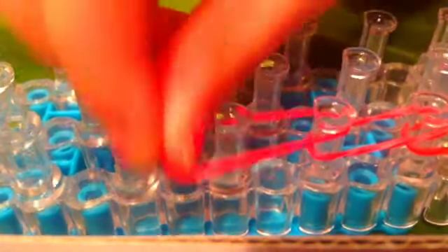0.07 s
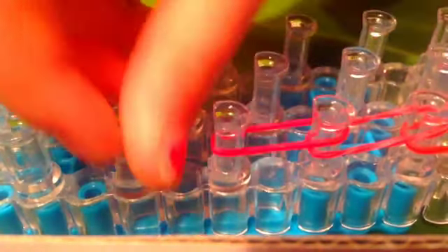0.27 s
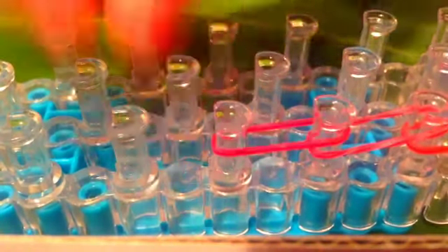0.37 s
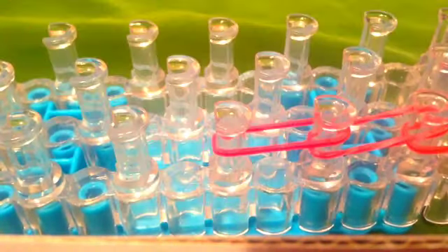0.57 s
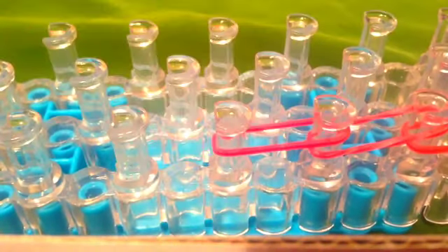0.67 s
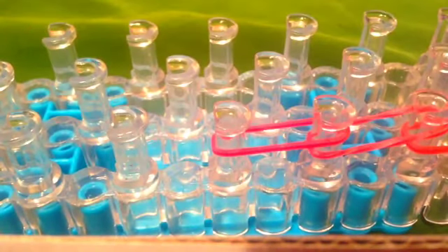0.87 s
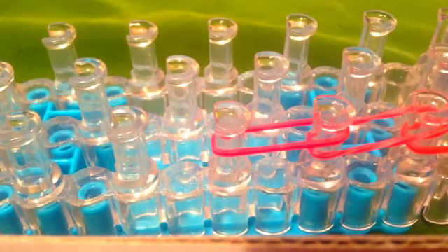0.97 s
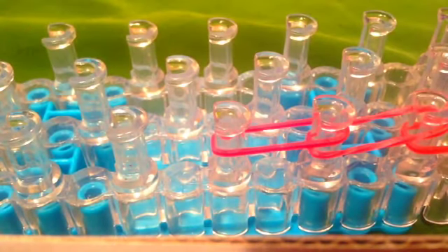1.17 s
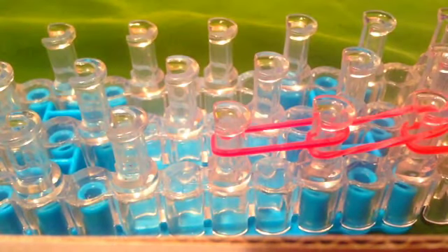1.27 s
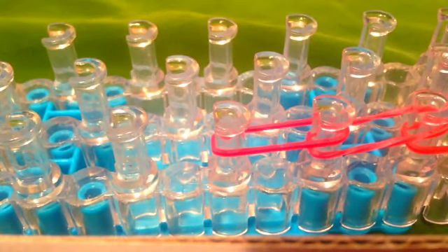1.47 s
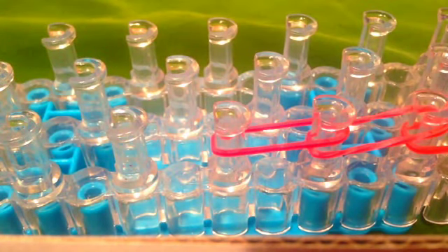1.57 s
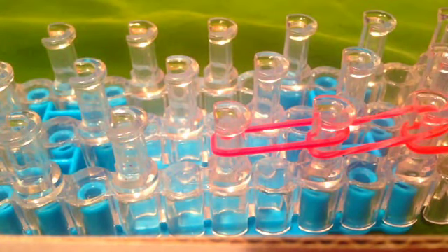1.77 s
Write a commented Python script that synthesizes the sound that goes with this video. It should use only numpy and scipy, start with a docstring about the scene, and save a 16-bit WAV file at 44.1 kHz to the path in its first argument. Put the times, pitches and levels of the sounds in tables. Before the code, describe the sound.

A rubber band slips off a fingertip and snaps onto a plastic peg with one bright click and a slight hollow knock. Soft finger rubbing surrounds it, then faint ticks follow, close to the microphone in a quiet room.

```python
"""Fingers rub and bump a plastic loom, close up, easing a rubber band over a peg.
At 0.21 s the band slips off the fingertip and snaps onto the peg: a bright click from contact noise
and peg modes, a hollow knock from the base modes, a short room tail. The fingers brush away.
Faint plastic ticks and hand shuffles sit over quiet room noise and a hum."""
import sys
import numpy as np
from scipy import signal
from scipy.fft import rfft, irfft, next_fast_len
from scipy.io import wavfile
from scipy.ndimage import map_coordinates

SR = 44100
rng = np.random.default_rng(int(sys.argv[2]) if len(sys.argv) > 2 else 0)


def log_audio(samples):
    """Write samples as a 16-bit WAV file to the path given in sys.argv[1]."""
    # one column per channel
    frames = np.atleast_2d(samples).T
    # limit to full scale, then quantise
    limited = np.clip(frames, -1, 1)
    pcm = np.round(limited * 32767).astype(np.int16)
    wavfile.write(sys.argv[1], SR, pcm)


N = 79380
T = np.arange(N) / SR

# room noise and hiss (frequency [Hz], level [dB])
AIR_SPECTRUM = [(25, -45), (50, -15), (84, -39), (105, -19.5), (150, -13), (235, -5.5), (290, -16),
                (340, -11), (420, -9), (480, -11.5), (620, -6.5), (800, -7), (960, -7.5), (1170, -16.5),
                (1600, -18), (2100, -20), (5000, -21.5), (10300, -22), (15800, -26)]
# narrow room resonances (frequency [Hz], width [Hz], level [dB])
RESONANCES = [(164.5, 17, -78), (233, 26, -77.5), (337, 22, -76), (626, 16, -74), (781, 18, -74),
              (936.5, 13, -80.5), (1265, 7.6, -85)]
# swell of the resonances (time [s], gain [dB])
RESONANCE_SWELL = [(0.5, -2.5), (0.96, -1.5), (1.07, 3), (1.3, 1.5), (1.45, -1), (1.8, 0)]
# hum envelope (time [s], level [dB])
HUM_ENVELOPE = [(0.3, -78), (0.95, -79), (1.08, -68), (1.33, -69), (1.42, -78), (1.8, -80)]
# hand moving away (time [s], level [dB], length [s])
SHUFFLE_STROKES = [(1.04, -65.5, 0.13), (1.15, -67.5, 0.061)]
# dull hand friction (frequency [Hz], level [dB])
SHUFFLE_SPECTRUM = [(80, -33), (200, -8), (370, -3), (550, -16), (1100, -12), (2200, -23), (3400, -16),
                    (5500, -24), (8000, -30), (15000, -38)]
# band dragging on the peg (time [s], level [dB], length [s])
DRAG_STROKES = [(0.085, -63.5, 0.08), (0.367, -70, 0.075)]
# band friction (frequency [Hz], level [dB])
DRAG_SPECTRUM = [(1000, -30), (3000, -24), (5500, -2), (6800, -15), (8200, -5), (10000, -8), (12000, 0),
                 (15300, -0.5)]
# plastic ticks (time [s], level [dB], treble tilt [dB/octave], t60 [s])
TICK_EVENTS = [(0.0144, -52, -3, 0.018), (0.0802, -45, 2, .012), (0.379, -51, -7.5, 0.066),
               (0.8752, -56.5, -14, 0.022), (1.486, -57, -8, 0.06)]
# tick before tilt (frequency [Hz], level [dB])
TICK_SPECTRUM = [(40, -52), (200, -10), (1400, -3.5), (2600, -19), (3300, -3), (4300, -8), (4900, -2),
                 (6000, -3), (7200, -12), (8500, -8), (10500, -10), (13000, -10), (15200, 3)]
# fingers on band and loom (time [s], level [dB])
FINGER_ENVELOPE = [(0, -49.5), (0.02, -56.5), (0.09, -49.5), (0.14, -52), (0.2, -50.5), (0.25, -63),
                   (0.355, -53.5), (0.42, -58.5), (0.52, -70)]
# dull rub (frequency [Hz], level [dB])
RUB_SPECTRUM = [(29, -77), (50, -58), (102, -8), (238, -12.5), (324, -3), (476, -20), (711, -12),
                (924, -23), (1030, -21.5), (2000, -31), (2600, -61), (4400, -120)]
# skin on rubber (frequency [Hz], level [dB])
RUSTLE_SPECTRUM = [(880, -26), (1500, 3), (2380, -38), (3170, 0), (4060, -6.5), (5140, 0), (6510, -10),
                   (8330, -7.5), (10200, -17), (15800, -4)]
# finger bumps on the loom (time [s], level [dB])
BUMP_EVENTS = [(0.013, -42), (0.037, -53.5), (0.068, -48.5), (0.086, -46.5), (0.119, -45), (0.164, -48.5),
               (0.198, -48), (0.349, -46.5)]
# room tail (frequency [Hz], level [dB])
TAIL_SPECTRUM = [(50, -55), (85, -32), (110, -14), (155, -9.5), (190, -0.5), (245, -11), (340, -12.5),
                 (460, -6), (600, -11), (950, -18.5), (1120, -28.5), (1350, -19.5), (2000, -28.5),
                 (2700, -33), (3250, -16.5), (3750, -16), (4100, -23), (4500, -20.5), (4850, -24.5),
                 (5300, -15), (6100, -29.5), (6650, -21), (7400, -34), (8700, -21.5), (9900, -29),
                 (12400, -20.5), (14200, -19), (15200, -14), (15900, -21)]
# room decay (frequency [Hz], t60 [s])
ROOM_DECAY = [(150, 0.32), (500, 0.4), (1500, 0.5), (4000, 0.47), (8000, 0.33), (15000, 0.25)]
# hollow base (frequency [Hz], level [dB], t60 [s])
BASE_MODES = [(109.4, -27.5, 0.29), (149.3, -12.5, 0.39), (183.7, -12.5, 0.5), (297.7, -4.5, 0.097),
              (328, -4, 0.2), (367.5, -12.5, 0.31), (448, -4, 0.27), (536.7, -8, 0.17), (620, 0, 0.067),
              (688, -12.5, 0.14), (828, -1, 0.047), (998, -4.5, 0.078), (1270, -7, .05), (1434, -8, 0.057)]
# peg (frequency [Hz], level [dB], t60 [s])
PEG_MODES = [(2095, -25, .03), (3260, -22, 0.047), (3600, -21, 0.037), (3720, -19, 0.032),
             (4370, -25, 0.026), (4480, -24.5, .03), (5190, -21, 0.027), (5530, -13.5, 0.026),
             (8710, -15, 0.019), (12500, -8, 0.011), (13050, -34, 0.016), (13860, -8.5, 0.016),
             (13890, -13, 0.013), (15150, 4, 0.006)]
# contact noise (frequency [Hz], level [dB])
CRACK_SPECTRUM = [(40, -36), (130, -15), (300, -12.5), (1300, -12.5), (2100, -22), (2650, -34.5),
                  (3400, -8), (5500, -12), (6800, -18), (8500, -10), (10000, -16), (12500, -5.5),
                  (15200, -7.5), (16500, -8.5)]
# slip off the nail, blow on the peg, rebound (time [s], crack [dB], crack t60 [s], ring [dB])
SNAP_CONTACTS = [(0.2118, -13.5, 0.022, -27), (0.2128, -11.5, .007, -8), (0.2147, -19.5, 0.023, -26)]


def amp(db):
    """Decibels to gain."""
    return 10 ** (np.asarray(db) / 20)


def unit_rms(x):
    """Scale to rms 1."""
    return x / np.sqrt(np.mean(x ** 2) + 1e-20)


def log_interp(points, hz):
    """Interpolate (frequency [Hz], value) rows on a log axis."""
    knots_hz, values = np.transpose(points)
    return np.interp(np.log(hz + 1), np.log(knots_hz + 1), values)


def curve(rows):
    """Interpolate (time [s], value) rows per sample."""
    return np.interp(T, *np.transpose(rows))


def wobble(rate_hz):
    """Smooth random curve, knots at rate_hz."""
    return map_coordinates(rng.standard_normal(int(N * rate_hz / SR) + 4), [T * rate_hz])


def filtered(x, gain_at):
    """Zero-phase filter with gain_at(hz)."""
    size = next_fast_len(N + 8192)
    return irfft(rfft(x, size) * gain_at(np.fft.rfftfreq(size, 1 / SR)), size)[:N]


def coloured(x, spectrum):
    """Shape x by a spectrum; rms 1."""
    return unit_rms(filtered(x, lambda hz: amp(log_interp(spectrum, hz))))


def noise(spectrum):
    """Coloured noise, rms 1."""
    return coloured(rng.standard_normal(N), spectrum)


def fade(age_s, t60_s):
    """Exponential fall, 60 dB per t60_s."""
    return np.exp(-np.log(1000) * age_s / t60_s)


def rise(age_s, attack_s):
    """Exponential approach to 1."""
    return 1 - np.exp(-age_s / attack_s)


def burst(spectrum, start_s, t60_s, attack_s):
    """Noise with a quick rise and exponential fall."""
    age_s = np.maximum(T - start_s, 0)
    return noise(spectrum) * fade(age_s, t60_s) * rise(age_s, attack_s)


def ring(modes, start_s, attack_s):
    """Struck damped modes; random phase, 1 dB level scatter."""
    age_s = np.arange(SR // 2) / SR
    tone = sum(amp(db + rng.normal(0, 1)) * fade(age_s, t60_s)
               * np.sin(2 * np.pi * (hz * age_s + rng.random())) for hz, db, t60_s in modes)
    return np.pad(tone * rise(age_s, attack_s), (round(start_s * SR), N))[:N]


def room_noise(air_db=-62.5):
    """Steady air noise and hiss, plus wavering low resonances."""
    def peaks(hz):
        return sum(amp(db) * np.sqrt(2 * SR / (np.pi * width_hz))
                   / (1 + (2 * (hz - centre_hz) / width_hz) ** 2)
                   for centre_hz, width_hz, db in RESONANCES)
    resonances = filtered(rng.standard_normal(N), peaks)
    return amp(air_db) * noise(AIR_SPECTRUM) + amp(curve(RESONANCE_SWELL)) * resonances


def hum(centre_hz=400, drift_hz=1.5):
    """Faint drifting tone that swells briefly."""
    hz = centre_hz + drift_hz * wobble(6)
    rms = amp(curve(HUM_ENVELOPE) + wobble(12))
    return rms * np.sqrt(2) * np.sin(2 * np.pi * (np.cumsum(hz) / SR + rng.random()))


def friction(strokes, spectrum, grain_db=3.7):
    """Grainy sliding noise; each stroke swells fast, then fades."""
    envelope = sum(amp(db) * np.sin(np.pi * np.sqrt(np.clip((T - start_s) / length_s, 0, 1)))
                   for start_s, db, length_s in strokes)
    return envelope * unit_rms(noise(spectrum) * amp(grain_db * wobble(300)))


def plastic_ticks(tilt_above_hz=4000):
    """The plastic creaks under band tension."""
    ticks = np.zeros(N)
    for start_s, db, db_per_octave, t60_s in TICK_EVENTS:
        spectrum = [(hz, level_db + db_per_octave * np.log2(max(hz / tilt_above_hz, 1)))
                    for hz, level_db in TICK_SPECTRUM]
        ticks += amp(db) * burst(spectrum, start_s, t60_s, attack_s=0.00074)
    return ticks


def finger_slips(rub_db=-5, rustle_db=-10.5, slips_per_s=900, spread_db=4):
    """Tiny slips of skin on rubber: a dull rub through the base, a thin rustle."""
    def slips(spectrum):
        impulses = (rng.random(N) < slips_per_s / SR) * rng.choice([-1, 1], N)
        return coloured(impulses * amp(spread_db * rng.standard_normal(N)), spectrum)
    rustle = unit_rms(noise(RUSTLE_SPECTRUM) + 0.6 * slips(RUSTLE_SPECTRUM))
    return amp(curve(FINGER_ENVELOPE)) * (amp(rub_db) * slips(RUB_SPECTRUM) + amp(rustle_db) * rustle)


def finger_bumps(cutoff_hz=380, t60_ratio=0.58):
    """The fingertip sticks and gives, ringing the base; skin dulls the blow and damps the ring."""
    soft_modes = [(hz, db - 10 * np.log10(1 + (hz / cutoff_hz) ** 4), t60_s * t60_ratio)
                  for hz, db, t60_s in BASE_MODES]
    return sum(amp(db) * ring(soft_modes, start_s, attack_s=0.0026) for start_s, db in BUMP_EVENTS)


def room_tail(early_db=-26.5, tail_db=-38):
    """Bright reflections of the snap off loom and table, then a diffuse tail; treble dies first."""
    start_s = SNAP_CONTACTS[1][0]  # blow on the peg
    hz, frame_s, bands = signal.stft(noise(TAIL_SPECTRUM), SR, nperseg=256)
    bands *= fade(np.maximum(frame_s - start_s, 0), log_interp(ROOM_DECAY, hz)[:, None])
    tail = signal.istft(bands, SR, nperseg=256)[1][:N]
    tail *= rise(np.maximum(T - start_s, 0), attack_s=0.0013)
    early = burst(CRACK_SPECTRUM, start_s, t60_s=0.047, attack_s=0.001)
    return amp(tail_db) * tail + amp(early_db) * early


def band_snap(click_attack_s=0.00032, knock_db=-32.5, low_cut_hz=102):
    """Each contact cracks and rings the peg; the base knocks once; the whole snap is thin in deep bass."""
    click = np.zeros(N)
    for start_s, crack_db, t60_s, ring_db in SNAP_CONTACTS:
        click += amp(ring_db) * ring(PEG_MODES, start_s, click_attack_s)
        click += amp(crack_db) * burst(CRACK_SPECTRUM, start_s, t60_s, click_attack_s)
    knock = amp(knock_db) * ring(BASE_MODES, start_s=0.2126, attack_s=0.00028)
    low_cut = signal.butter(2, low_cut_hz, "high", fs=SR, output="sos")
    return signal.sosfilt(low_cut.repeat(2, axis=0), click + knock)  # two stages


def scene():
    """Mono sum at one close microphone."""
    handling = finger_slips() + finger_bumps()
    handling += friction(DRAG_STROKES, DRAG_SPECTRUM)
    handling += friction(SHUFFLE_STROKES, SHUFFLE_SPECTRUM)
    return (band_snap() + room_tail() + plastic_ticks() + handling + room_noise() + hum())[None]


def record(dry, low_cut_hz=61, top_hz=15900):
    """Bass cut and steep upper band limit."""
    low_cut = signal.butter(2, low_cut_hz, "high", fs=SR, output="sos")
    band_limit = signal.ellip(10, 0.1, 90, top_hz, fs=SR, output="sos")
    return signal.sosfilt(band_limit, signal.sosfilt(low_cut, dry))


dry = scene()
out = record(dry)
log_audio(out)
```